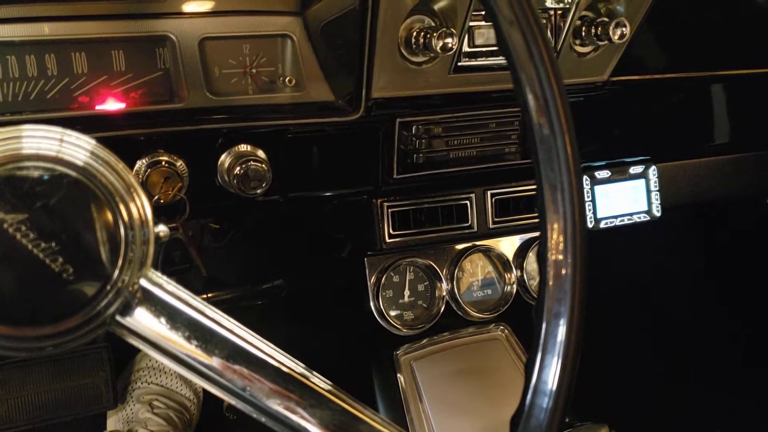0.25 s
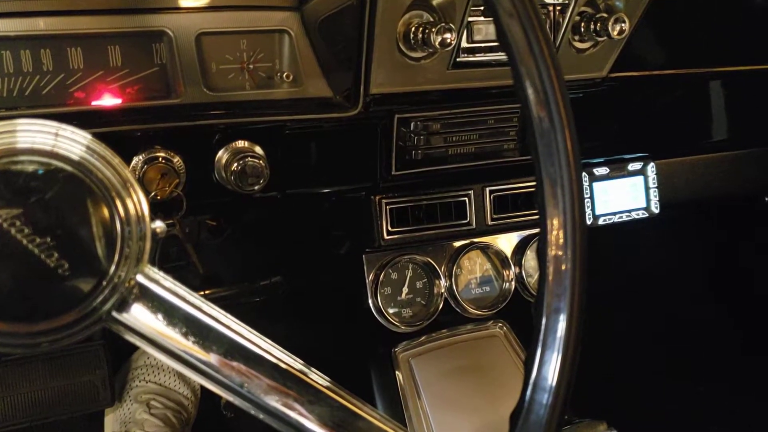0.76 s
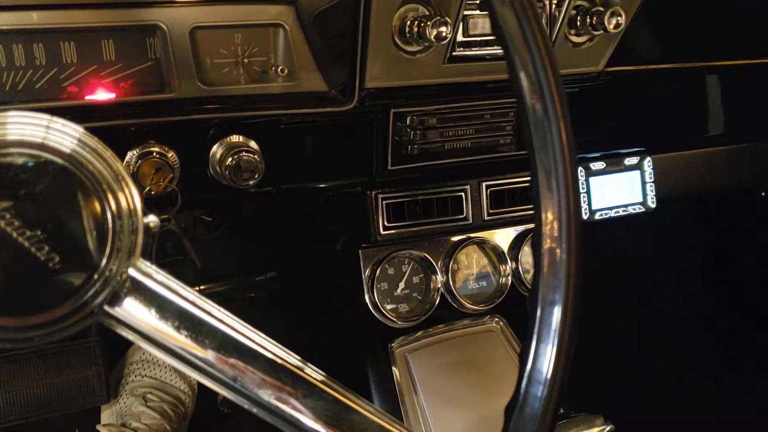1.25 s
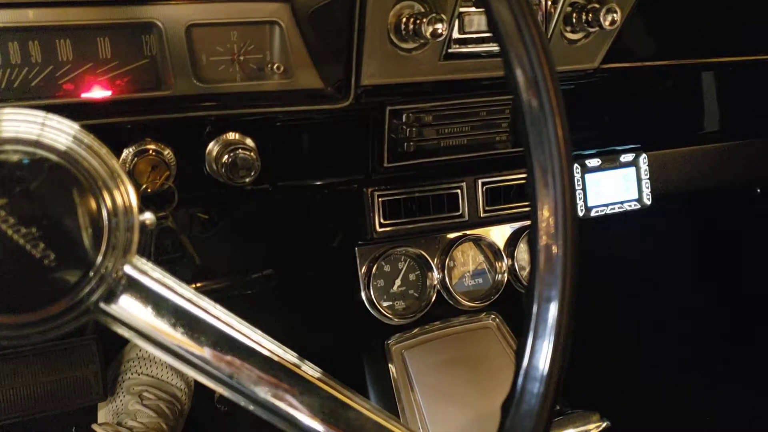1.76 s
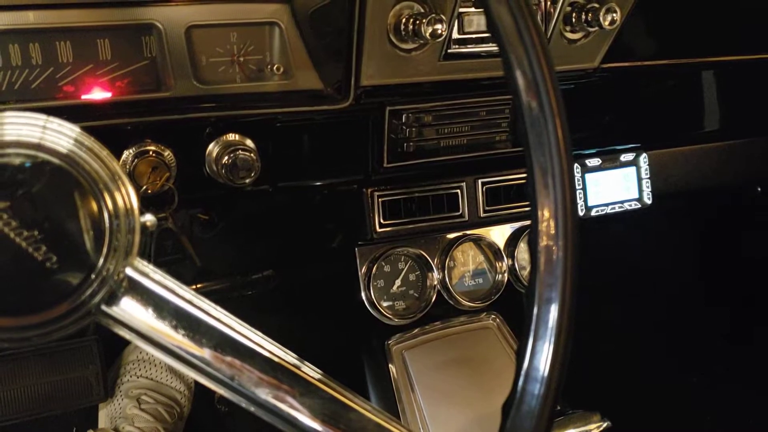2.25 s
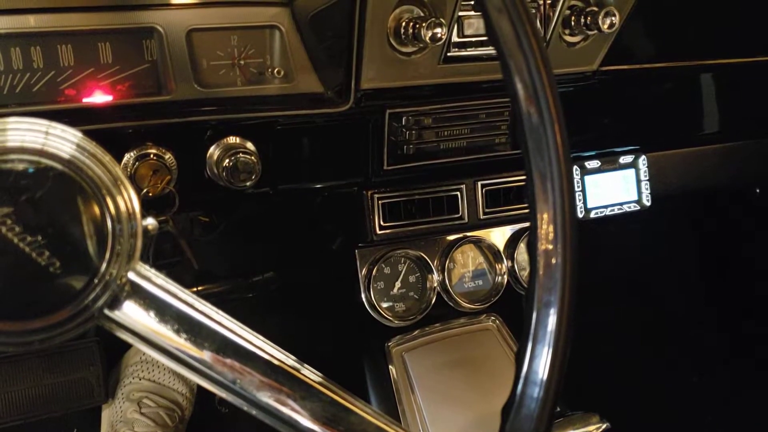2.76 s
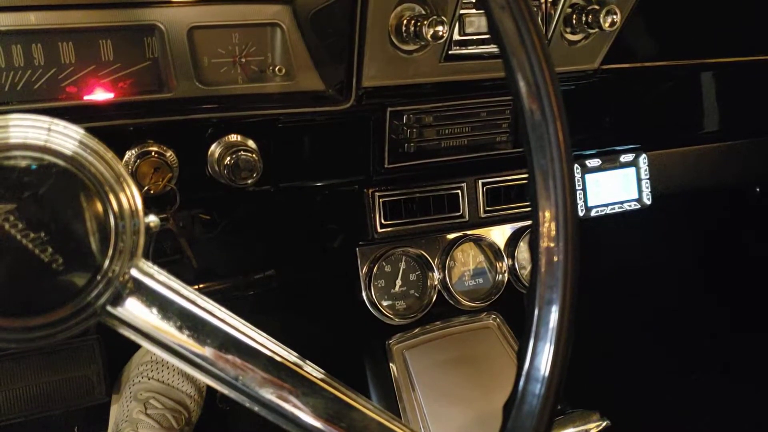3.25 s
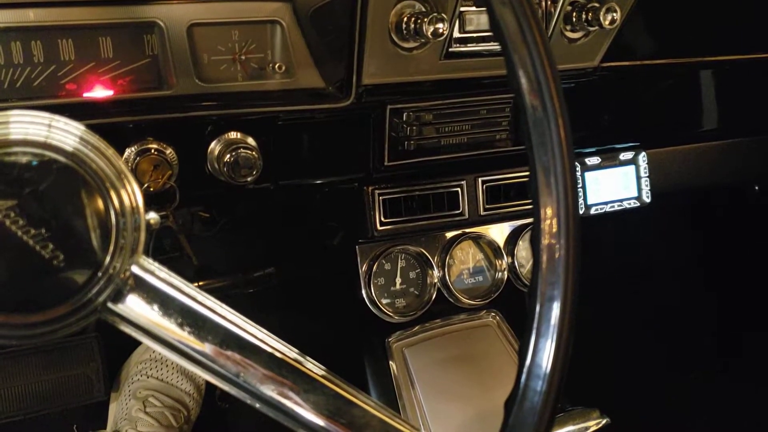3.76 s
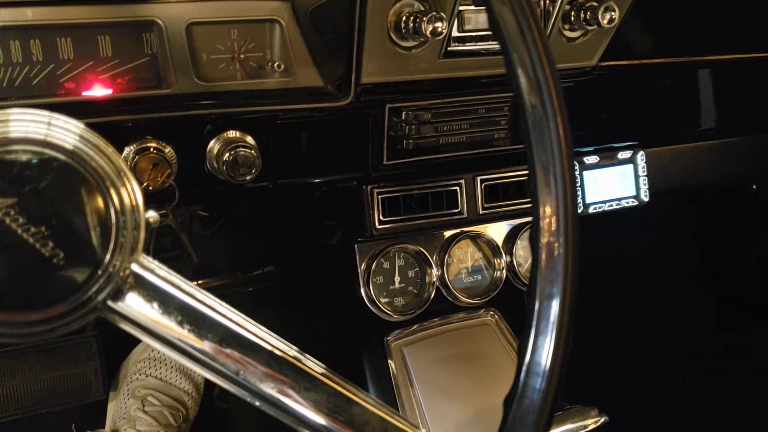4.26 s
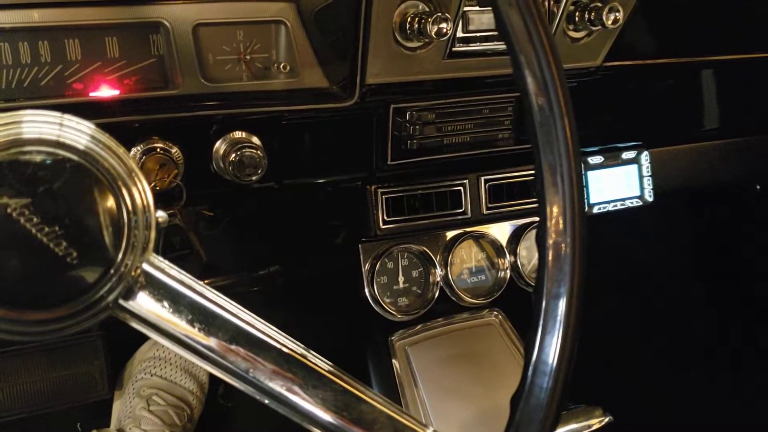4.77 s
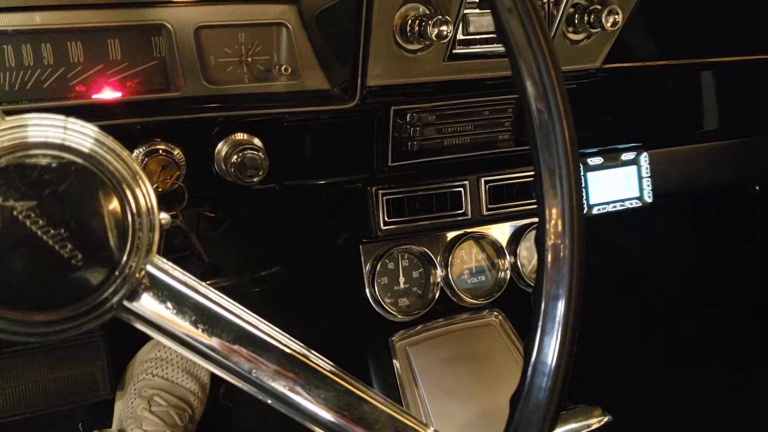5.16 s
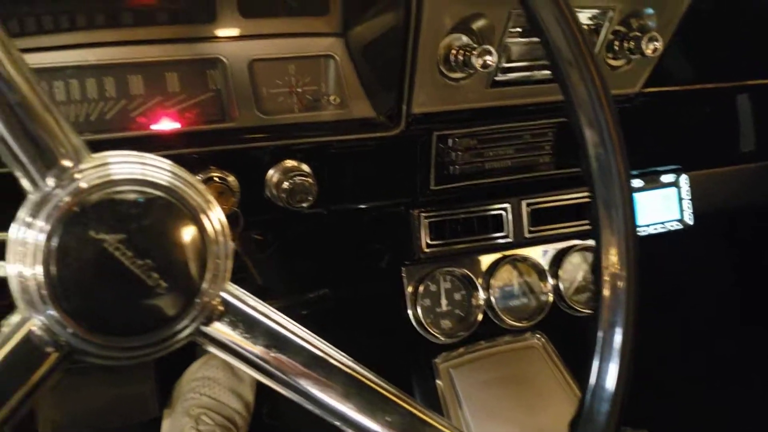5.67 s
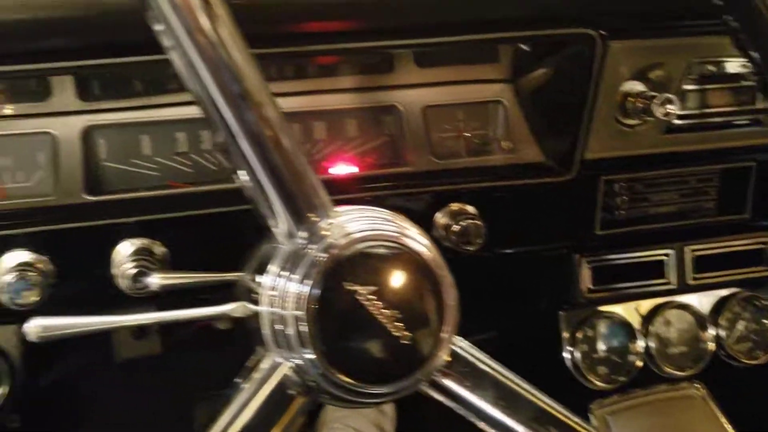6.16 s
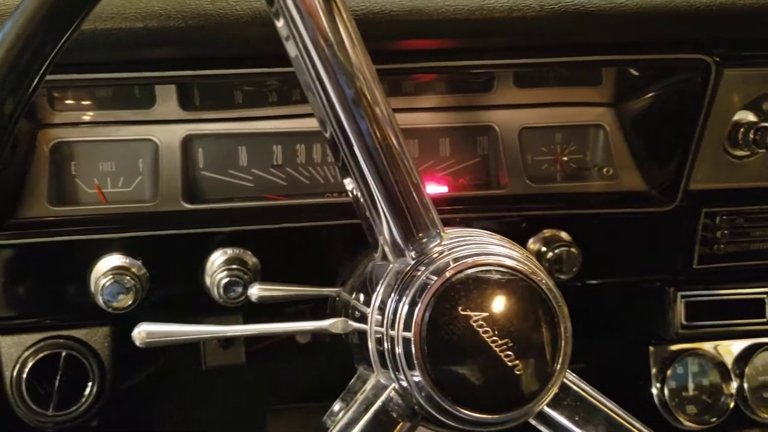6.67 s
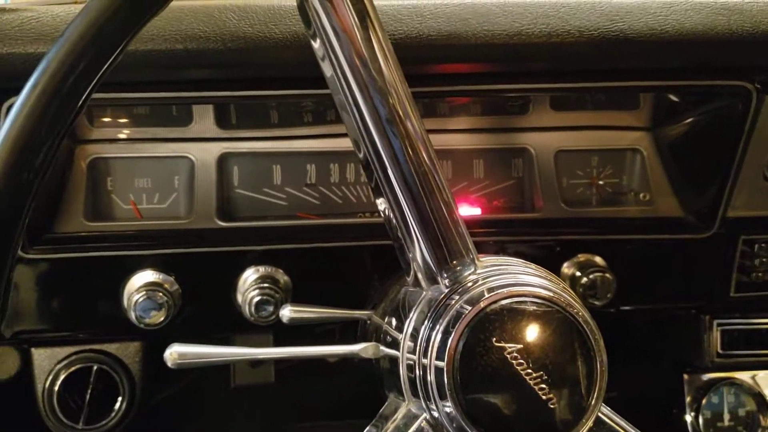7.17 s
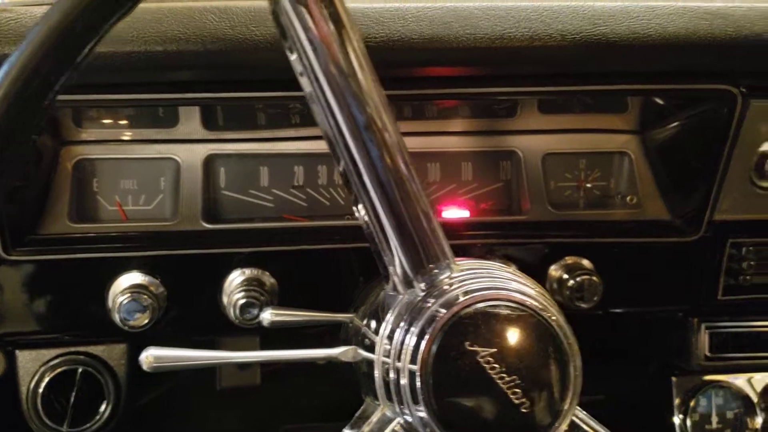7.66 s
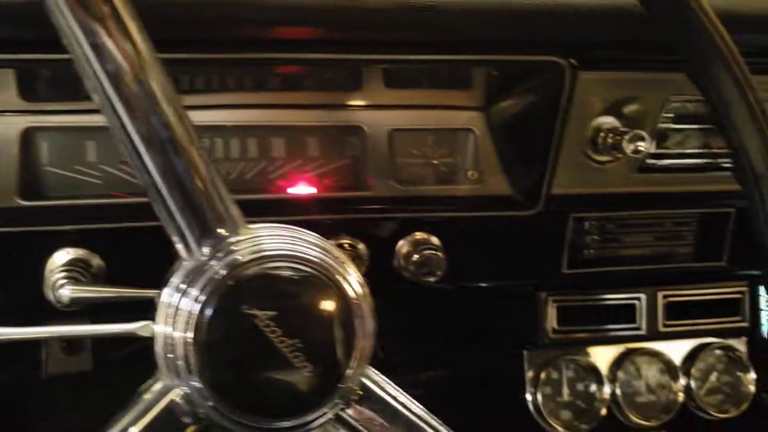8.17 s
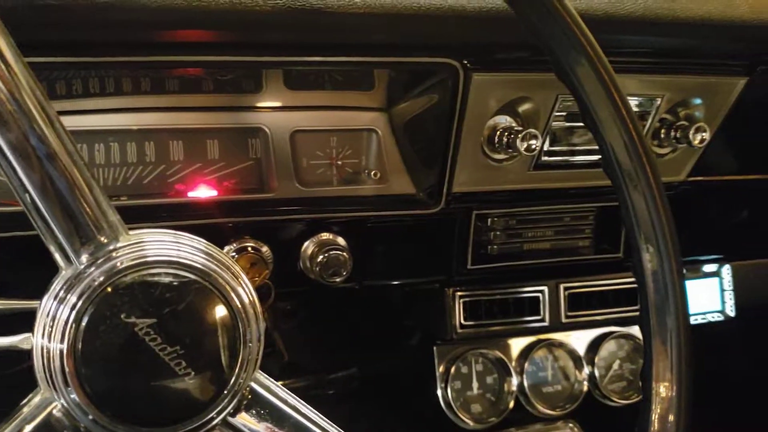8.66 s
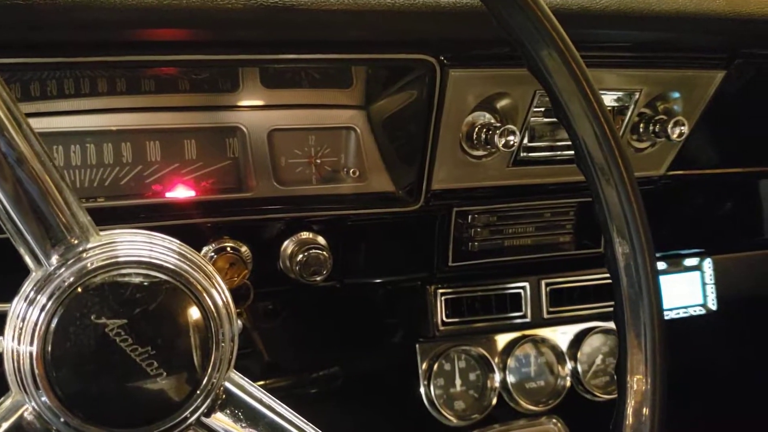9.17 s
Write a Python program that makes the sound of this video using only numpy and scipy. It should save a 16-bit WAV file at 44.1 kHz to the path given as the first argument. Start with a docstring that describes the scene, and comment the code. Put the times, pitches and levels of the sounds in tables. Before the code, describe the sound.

Heard from the driver's seat, a large car engine revs up twice, falls away with uneven thumps, and settles into lumpy idle with valve clatter.

```python
"""A big cross-plane V8 rasps under a light pedal, is blipped twice, runs down and settles to a loping idle.
Heard from the driver's seat, eight unequal exhaust pulses a cycle excite pipes, cabin modes and ringing panels.
Filtered noise bursts at the firings give intake and fan rush at speed; valve seatings give the patter of idle.
A sine whine, brief metallic ticks and ringing lifter clacks are added; left and right differ in colour and delay."""
import sys
import numpy as np
from scipy import signal
from scipy.fft import rfft, irfft
from scipy.io import wavfile
from scipy.ndimage import uniform_filter1d, map_coordinates

SR = 44100
rng = np.random.default_rng(int(sys.argv[2]) if len(sys.argv) > 2 else 0)


def store_pcm(level_fs):
    """Save levels as 16-bit WAV."""
    pcm = np.round(np.clip(level_fs, -1, 1) * 32767).astype(np.int16)
    wavfile.write(sys.argv[1], SR, np.atleast_2d(pcm).T)


N = 415422
TIME = np.arange(N) / SR  # s
FREQ = np.arange(N // 2 + 1) * SR / N  # Hz

# Steady whine: frequency in Hz, level in dB before and after the microphones move
PUMP_HZ, PUMP_DB = 426, (-61.5, -53)
MOVE_S = (5.6, 6.1)  # the microphones move towards the steering column

# Ticks of loose metal as the engine runs down: [t/s, level/dB before a common trim]
BUZZ_TICKS = [(3.454, -75), (3.47, -57), (3.536, -33), (3.566, -57), (3.616, -59)]

# Hardest clacks of a lifter at idle: [t/s, level/dB before a common trim]
LIFTER_CLACKS = [(5.9237, -40.5), (6.0499, -49), (6.114, -44), (6.2111, -37), (6.2749, -44), (6.4191, -38),
                 (6.5348, -38), (6.8262, -39), (6.995, -45), (7.0357, -36.5), (7.1549, -38), (7.1938, -44),
                 (7.2522, -38), (7.2961, -46), (7.354, -44), (7.4453, -40), (7.468, -38), (7.492, -44),
                 (7.6159, -41), (7.7446, -41), (7.9252, -41), (8.0818, -53), (8.3088, -54), (8.7224, -41),
                 (8.873, -51)]
# Ring of those clacks: [f/Hz, relative level/dB]
CLACK_SPECTRUM = [(2800, -26), (3500, -9), (3950, -29), (4230, 9), (4550, -13), (6800, -7), (9000, -45)]
CHIRP_HZ, CHIRP_DB = 4260, -2  # clearest mode of a clack, against the rest of its ring

# Valve patter through the bulkhead: [f/Hz, relative level/dB]
PATTER_SPECTRUM = [(500, -21), (1000, -8), (1250, -13), (1550, -5), (1900, 2), (2350, -7.5), (2900, -12),
                   (3500, -8), (4250, -6.5), (4900, -12.5), (7000, -11), (8300, -20.5), (11500, -20),
                   (15000, -32)]
# Ticks of the loose lifters: [place in the engine cycle (0-1), relative level/dB]
LIFTER_TICKS = [(0.151, 5.5), (0.45, -2), (0.81, -2.5)]
# Ring of the loose lifters: [f/Hz, relative level/dB]
LIFTER_SPECTRUM = [(2500, -58), (3500, 4), (3900, 3), (4230, 4), (4600, -11), (6500, -4.5), (9000, -39.5)]

# Fan and air cleaner through the bulkhead: [f/Hz, relative level/dB]
RUSH_SPECTRUM = [(250, -26.5), (430, 1), (600, -17.5), (850, -1.5), (1200, -13.5), (1400, -19), (1680, -6),
                 (2030, -1), (2450, -12), (3200, -12), (4000, -8.5), (5500, -14.5), (7200, -12),
                 (8300, -24), (11500, -20), (15000, -32.5)]
RUSH_DB = -1.5  # change of the rush at throttle 1; none when shut
# Rasp of the open carburettor, before its pitch moves: [f/Hz, relative level/dB]
RASP_SPECTRUM = [(1750, -35.5), (1950, 12), (2070, 12.5), (2200, 3), (2400, 3.5), (2600, -0.5), (3000, -11),
                 (3500, -16), (4100, 1), (5200, -16.5), (6500, -17), (9000, -46.5)]
# Centre of the rasp: [t/s, f/Hz]
RASP_CENTRE = [(0, 1976), (.4, 2008), (.65, 2090), (.85, 2130), (1.1, 1960), (1.58, 1890), (1.75, 2008),
               (1.95, 2146), (2.2, 1983)]
# Howl of the carburettor's throat, as placed at RASP_RPM: [f/Hz, relative level/dB]
HOWL_SPECTRUM = [(1900, -44.5), (2330, 3), (2520, -8), (2900, -19), (4400, -29), (4950, -5), (5700, -18.5),
                 (8000, -43)]
RASP_HZ, RASP_RPM = 2050, 2500  # centre of the rasp and engine speed at which the spectra are unshifted
HOWL_RISE = 0.23  # howl frequency grows as this power of engine speed
HOWL_DB, HOWL_SPEED_DB = -8.5, 6  # level against the rasp at RASP_RPM; dB per doubling of speed
AIR_LAG_S = 0.024  # the air follows the pedal a little late

# Floor and dash: [f/Hz, relative level/dB]
BODY_SPECTRUM = [(120, -13), (220, 4), (275, -2.5), (320, 1), (370, -5.5), (480, -8.5), (600, -6),
                 (720, -4.5), (850, -10), (1100, -16), (1500, -12.5), (3000, -71.5)]
# Ringing panels:
# [f/Hz, width/Hz, level/dB at speeds far from the panel's own, its own speed/rpm, level change there/dB]
PANEL_MODES = [(308, 19, -2.5, 2040, 12.5), (362.5, 12, -4, 2400, 14.5), (417.2, 44, -1.5, 2700, 6.5),
               (468.4, 58, -10.5, 3000, 17.5), (675, 46, 4, 1430, 6), (843, 33, 1, 4500, 14),
               (961, 24, 6.5, 1540, -27)]
PANEL_OCTAVES = 0.53  # range of speed over which a panel's level changes

# Crankshaft speed: [t/s, speed/rpm]
CRANK_SPEED = [(0.0, 1614), (0.2, 1680), (0.35, 1860), (0.5, 2316), (0.65, 2810), (0.8, 3132), (0.88, 3170),
               (1.1, 2573), (1.36, 1975), (1.48, 1929), (1.62, 2205), (1.78, 2735), (1.94, 3040),
               (2.15, 2510), (2.39, 2017), (2.9, 1292), (3.36, 975), (3.91, 779), (4.6, 798), (5.21, 763),
               (5.5, 789), (6.93, 780), (7.15, 756), (8.51, 769), (8.88, 792), (9.42, 762)]
# Pedal presses: [down t/s, up t/s, throttle (0-1), carburettor level/dB]
PEDAL_PRESSES = [(-0.4, 0.104, 0.36, 8.5), (0.217, 0.805, 0.71, 1), (1.379, 1.866, 0.73, 1)]
OPEN_S, CLOSE_S = 0.25, 0.23  # full-scale ramp time on opening; decay constant on release
IDLE_RPM = 780  # reference speed of the loudness laws
# Cylinders in firing order, as their pulses leave the pipes:
# [strength/dB and lateness/crank degrees at lope 1, pipe delay/ms at speed, change/dB under throttle]
CYLINDER_PULSES = [(2.5, 24, 0.41, 3), (4.1, -13.5, 1.85, -0.3), (-4, -6, 1.1, 3.5), (1, -5.8, .3, 2),
                   (2.3, 22, 1.65, 0.4), (-.4, 4.5, 0.08, -5), (0.5, -9.5, 0.69, 2.5), (1.2, 14.5, 1.4, 0)]
FIRST_FIRING = 0.81  # place of the first firing, in firing intervals
# Burn with the throttle shut: [speed/rpm, lope (0 = cylinders alike, 1 = full inequality), scatter/dB]
BURN_ROUGHNESS = [(769, 0.933, 2), (957, 0.55, 3), (1230, 0.23, 3), (1500, 0.41, 4.5), (2630, .6, 4.5)]
THROTTLE_EVENS, THROTTLE_CLEANS = 0.8, 0.93  # shares of lope and of scatter that pulling removes
CLEAN_THROTTLE = 0.25  # throttle scale over which the burn steadies
STUMBLE_S = 0.046  # decay constant of the pedal's steadying effect on the burn after release
# Unburnt fuel thumps in the pipes: [t/s, level of the nearest firing/dB]
PIPE_THUMPS = [(.855, 7), (1.975, 4.5), (2.075, 6), (2.215, 6.5), (2.375, 12), (2.45, 10), (2.685, 10.5)]

# Silencers and cabin air: [f/Hz, relative level/dB]
PIPE_SPECTRUM = [(20, -51.5), (32, -4), (42, -5), (52, 3), (65, 12), (80, 5), (98, -10.5), (125, -4.5),
                 (150, -13.5), (178, -21.5), (194, -25), (209, -16.5), (228, -28), (265, -35), (350, -47),
                 (900, -69.5)]
# Hardening of the pulses by an open throttle: [f/Hz, level change/dB]
BARK_SPECTRUM = [(30, -7.5), (55, -18), (70, -5), (85, 6), (100, 4.5), (120, -0.5), (140, 1), (165, 4),
                 (190, 9), (215, 9), (260, 12.5), (320, 15), (430, 22), (600, 16.5), (900, -6)]
# Cabin modes and nulls crossed by the firing note: [f/Hz, width/Hz, level change/dB with throttle shut]
CABIN_BOOMS = [(61.3, 2.7, 6.5), (77.3, 15.7, 8), (102, 6, -5.1), (147.4, 23, 2.5), (199.3, 19, -5)]
THROTTLE_BOOM = 2.6  # throttle 1 deepens the booms by this share
STARVE_RPM, STARVE_DB = (1370, 1460), -4  # coasting above this range weakens the firing note

# Loudness laws: (level/dB at IDLE_RPM, dB per doubling of speed, dB for throttle 1, dB once microphones are nearer)
EXHAUST_LOUDNESS = (-19.5, 3, -8, 3.5)
BODY_LOUDNESS = (-49, 5, 3.5, 5)
INTAKE_LOUDNESS = (-54, 5.5, 9, 6.5)
VALVE_LOUDNESS = (-50.5, -4.5, 31, 6.5)
# Overall level of the engine layers over time: [t/s, level/dB]
OVERALL_LEVEL = [(0, -5.5), (0.15, -5.5), (0.45, 0.5), (1.35, -3), (1.6, 5), (2.3, 2), (3.4, -2), (3.9, -2),
                 (5.5, 0.6), (7.7, 1.7), (9.42, 0)]

# Microphone pair: [f/Hz, left minus right level/dB]
SIDE_LEVELS = [(30, 1.84), (65, 2.7), (125, 4.6), (300, 6.05), (700, 5.06), (1200, 7), (2000, 9.1),
               (3000, 10.44), (4500, 15.1), (7000, 16.86), (8300, 17.9), (10000, 0.2), (11500, -9),
               (15000, -1)]
# Likeness of the reflections on the two sides: [f/Hz, likeness (0-1)]
SIDE_LIKENESS = [(150, 0.91), (300, 1), (600, 0.32), (2000, 0.35), (4000, 0.061), (15000, 0.05)]
RIGHT_LAG_S = 0.00038  # sound reaches the left microphone first
TOP_HZ = 15500  # upper band edge


def undb(db):
    """Amplitude ratio from decibels."""
    return 10 ** (np.asarray(db) / 20)


def curve(table, at=TIME):
    """Linear interpolation of a table's columns over its first column."""
    place, *columns = np.transpose(table)
    return [np.interp(at, place, column) for column in columns]


def spectrum(points):
    """Linear interpolation over log frequency."""
    hz, value = np.transpose(points)
    return np.interp(np.log(FREQ + 1), np.log(hz), value)


def colour(x, db):
    """Minimum-phase filtering: folding the cepstrum makes a given gain curve causal."""
    cepstrum = irfft(db * np.log(10) / 20, N)
    cepstrum[1:N // 2] *= 2
    cepstrum[N // 2 + 1:] = 0
    response = irfft(np.exp(rfft(cepstrum)), N)[:SR // 4]
    return signal.fftconvolve(np.atleast_2d(x), response[None], axes=1)[:, :N]


def steady(x, size=9000):
    """Power normalisation: the running RMS of the mid signal is held near 1."""
    power = uniform_filter1d(uniform_filter1d(x.mean(0) ** 2, size), size)
    return x / np.sqrt(power + 1e-18)


def walk(rate):
    """Slow random modulation: levels held for 1 / rate seconds, then smoothed twice."""
    k = int(SR / rate)
    held = np.repeat(rng.standard_normal(N // k + 1), k)
    return uniform_filter1d(uniform_filter1d(held, k), k)[:N]


def pulses(times, sizes):
    """Impulse train with fractional timing: each click is shared between two samples."""
    at = np.clip(times * SR, 0, N)
    i = at.astype(int)
    late_share = at - i
    early = np.bincount(i, sizes * (1 - late_share), N + 2)
    late = np.bincount(i + 1, sizes * late_share, N + 2)
    return (early + late)[:N]


def decaying(clicks, decay_s):
    """Exponential relaxation after each click, with time constant decay_s."""
    return signal.lfilter([1], [1, -np.exp(-1 / (decay_s * SR))], clicks)


def bursts(clicks, decay_s, bed):
    """Amplitude-modulated noise: dying bursts over an even bed, independent on two paths."""
    gate = decaying(clicks, decay_s)
    gate = gate / (uniform_filter1d(gate, size=12000) + 1e-9)
    return (gate + bed) * rng.standard_normal((2, N))


def cabin(x, t60):
    """Diffuse reverberation off glass and trim, with frequency-dependent likeness between sides."""
    t = TIME[:SR // 4]
    tails = rng.standard_normal((2, len(t))) * undb(-60 * t / t60)
    paths = rfft(tails, N)
    # reflections ripple the spectrum finely but leave its broad shape alone
    paths /= np.sqrt(uniform_filter1d(abs(paths) ** 2, size=1100, axis=1))
    mid, side = paths * rfft(x)
    alike = np.clip(spectrum(SIDE_LIKENESS), -1, 1)
    return irfft(mid * np.sqrt(1 + alike) + side * np.sqrt(1 - alike) * np.array([[1], [-1]]), N)


def microphones(x):
    """Level and time differences of a spaced pair: power is shared per frequency and the right lags."""
    gains = undb(spectrum(SIDE_LEVELS) * np.array([[.5], [-.5]]))
    lag = np.exp(-2j * np.pi * FREQ * RIGHT_LAG_S * np.array([[0], [1]]))
    return irfft(rfft(x) * lag * gains / np.sqrt(np.mean(gains ** 2, 0)), N)


def pedal(close_s):
    """Throttle envelope 0-1: linear opening, a hold and exponential relaxation on release."""
    presses = []
    for down, up, depth, _ in PEDAL_PRESSES:
        opening = np.clip((TIME - down) / OPEN_S, 0, 1)
        release = np.exp(-np.maximum(TIME - up, 0) / close_s)
        presses.append(depth * opening * release)
    return np.clip(np.max(presses, 0), 0, 1)


def loudness(law, rpm, throttle):
    """Power law of level against speed, with throttle and microphone distance added in decibels."""
    idle_db, speed_db, throttle_db, nearer_db = law
    nearer = np.interp(TIME, MOVE_S, [0, 1])
    return undb(idle_db + speed_db * np.log2(rpm / IDLE_RPM) + throttle_db * throttle + nearer_db * nearer)


def pump(waver=0.00212, flicker_db=2):
    """Frequency-modulated sine: a thin whine, likely the electric fuel pump, clearer late in the idle."""
    phase = 2 * np.pi * np.cumsum(PUMP_HZ * (1 + waver * walk(8.5))) / SR
    db = np.interp(TIME, MOVE_S, PUMP_DB) + flicker_db * walk(6.6)
    return microphones(np.sqrt(2) * np.sin(phase) * undb(db))


def buzz(ring_s=0.0023, trim_db=-6):
    """Impact excitation: loose metal gives brief bright noise bursts."""
    s, db = np.transpose(BUZZ_TICKS)
    gate = decaying(pulses(s, undb(db + trim_db)), ring_s)
    bright = spectrum([(7000, -26), (12000, 4), (15000, -9)])
    return microphones(colour(gate * rng.standard_normal((2, N)), bright))


def clacks(ring_s=0.03, trim_db=-6.5, waver=0.0048):
    """Damped modal ringing: a hard lifter strike sounds as coloured noise with a short wavering chirp."""
    s, db = np.transpose(LIFTER_CLACKS)
    gate = decaying(pulses(s, undb(db + trim_db)), ring_s)
    mode = np.sin(2 * np.pi * np.cumsum(CHIRP_HZ * (1 + waver * walk(120))) / SR)
    ring = steady(microphones(colour(rng.standard_normal((2, N)), spectrum(CLACK_SPECTRUM))))
    return gate * (ring + undb(CHIRP_DB) * microphones(mode))


def tappets(cycle, unequal_db=3, scatter_db=2.0, count=16):
    """Cyclic impacts: each valve seats once a cycle, with a strength and lag of its own clearance."""
    k = np.arange(int(cycle[-1] * count))
    own_db, own_lag = rng.standard_normal((2, count))[:, k % count]
    times = np.interp((k + .25 * own_lag) / count, cycle, TIME)
    return pulses(times, undb(unequal_db * own_db + scatter_db * rng.standard_normal(len(k))))


def valve_gear(cycle, lifter_db=-9, tick_scatter_db=4, wander_db=1.3):
    """Superposed impact noise: a dense valve patter under uneven ticks of the loose lifters."""
    seats = tappets(cycle, unequal_db=1, scatter_db=2.2)
    patter = cabin(bursts(seats, 0.0043, 1.0), 0.089)
    patter = steady(microphones(colour(patter, spectrum(PATTER_SPECTRUM))))
    place, db = np.transpose(LIFTER_TICKS)
    due = np.arange(int(cycle[-1]))[:, None] + place
    sizes = undb(db + tick_scatter_db * rng.standard_normal(due.shape))
    ticks = pulses(np.interp(due.ravel(), cycle, TIME), sizes.ravel())
    lifter = cabin(bursts(ticks, 0.026, 0.22), 0.13)
    lifter = steady(microphones(colour(lifter, spectrum(LIFTER_SPECTRUM))))
    return undb(wander_db * walk(21)) * patter + undb(lifter_db) * lifter


def climbing(points, fired, ratio, decay_s, bed):
    """Moving resonances by time warping: filtered gulps of air are read at the given speed ratio."""
    at = np.cumsum(ratio)
    # the inverse warp beforehand keeps the gulps in step with the firings
    gulps = bursts(fired, decay_s, bed)[:, np.searchsorted(at, np.arange(N)) % N]
    gulps[:, int(at[-1]):] = 0
    sound = microphones(colour(cabin(gulps, 0.088), spectrum(points)))
    return steady(np.array([map_coordinates(side, [at], order=3, mode="mirror") for side in sound]))


def intake(fired, rpm, throttle):
    """Flow noise: fan and air cleaner rush, while throttle brings in the carburettor's moving rasp and howl."""
    rush = cabin(bursts(fired, 0.00079, 6.4), 0.075)
    rush = steady(microphones(colour(rush, spectrum(RUSH_SPECTRUM))))
    rasp = climbing(RASP_SPECTRUM, fired, curve(RASP_CENTRE)[0] / RASP_HZ, decay_s=.0028, bed=0.33)
    howl = climbing(HOWL_SPECTRUM, fired, (rpm / RASP_RPM) ** HOWL_RISE, decay_s=0.0013, bed=0.3)
    carburettor = rasp + howl * undb(HOWL_DB + HOWL_SPEED_DB * np.log2(rpm / RASP_RPM))
    _, up, _, press_db = np.transpose(PEDAL_PRESSES)
    carburettor_gain = np.sqrt(throttle) * undb(np.interp(TIME, up, press_db))
    return undb(RUSH_DB * np.sqrt(throttle)) * rush + carburettor_gain * carburettor


def engine_bay(fired, cycle, rpm, fast, throttle):
    """Equal-power crossfade: air leads at speed and valve gear takes over as the revs fall."""
    flow = np.interp(TIME - AIR_LAG_S, TIME, throttle)
    air = intake(fired, rpm, flow) * loudness(INTAKE_LOUDNESS, rpm, flow)
    valves = valve_gear(cycle) * loudness(VALVE_LOUDNESS, rpm, throttle)
    return np.sqrt(fast) * air + np.sqrt(1 - fast) * valves


def body(fired, rpm, throttle, knock_db=-2, pulling_db=9):
    """Forced vibration of floor and panels, each panel made louder or softer around one engine speed."""
    knocks = undb(knock_db + pulling_db * throttle) * steady(fired[None])
    drive = steady(bursts(fired, 0.0044, 5.5)) + knocks
    sound = colour(cabin(drive, 0.21), spectrum(BODY_SPECTRUM))
    shake = rfft(drive[0])
    for hz, width, db, panel_rpm, change_db in PANEL_MODES:
        ring = irfft(shake / (1 + 2j * (FREQ - hz) / width) ** 2, N)
        nearness = np.exp(-(np.log2(rpm / panel_rpm) / PANEL_OCTAVES) ** 2)
        sound = sound + ring * undb(db + change_db * nearness)
    return steady(microphones(sound))


def firings(cycle, rpm, fast, stray_degrees=2.05):
    """Periodic excitation, eight pulses in two turns: inequality makes lope, poor burning makes scatter."""
    k = np.arange(int(cycle[-1] * 8))
    due = (k + FIRST_FIRING) / 8
    pulling = np.tanh(pedal(STUMBLE_S) / CLEAN_THROTTLE)
    rpm, fast, pulling = (np.interp(due, cycle, control) for control in (rpm, fast, pulling))
    lope, scatter_db = curve(BURN_ROUGHNESS, rpm)
    lope = lope * (1 - THROTTLE_EVENS * pulling)
    scatter_db = scatter_db * (1 - THROTTLE_CLEANS * pulling)  # a light pedal already steadies the burn
    db, late, pipe_ms, pulling_db = np.array(CYLINDER_PULSES)[k % len(CYLINDER_PULSES)].T
    timing_chance, size_chance = rng.standard_normal((len(k), 2)).T
    # stray_degrees: crank degrees of timing scatter for each dB of size scatter
    degrees = lope * late + stray_degrees * scatter_db * timing_chance
    times = np.interp(due + degrees / 720, cycle, TIME)
    # unequal lengths of pipe bring out the growl of the odd orders
    times = times + fast * pipe_ms / 1000
    size_db = lope * db + pulling * pulling_db + scatter_db * np.minimum(size_chance, 1)
    for s, thump_db in PIPE_THUMPS:
        size_db[np.argmin(abs(times - s))] = thump_db
    return pulses(times, undb(size_db))


def exhaust(fired, cycle, rpm, throttle):
    """Resonance: pulses ring the pipes, and cabin modes and nulls reshape the firing note."""
    soft = colour(fired, spectrum(PIPE_SPECTRUM))
    hard = colour(soft, spectrum(BARK_SPECTRUM))
    tone = steady(microphones((1 - throttle) * soft + throttle * hard))
    firing_hz = 4 * rpm / 60
    # shift the firing note to 0 Hz, smooth it, and shift it back
    turn = np.exp(2j * np.pi * 8 * cycle)
    window = np.hanning(SR // 10)
    slow = signal.fftconvolve(tone / turn, window[None] / window.sum(), "same", axes=1)
    note = 2 * (turn * slow).real
    boom_db = sum(db * np.exp(-((firing_hz - hz) / width) ** 2) for hz, width, db in CABIN_BOOMS)
    starved = np.interp(rpm, STARVE_RPM, [0, 1]) * np.clip(1 - 3 * throttle, 0, 1)
    note_gain = undb(boom_db * (1 + THROTTLE_BOOM * throttle) + STARVE_DB * starved)
    return tone + (note_gain - 1) * note


def scene():
    """Superposition: one crankshaft and one pedal drive exhaust, body and engine bay."""
    rpm, = curve(CRANK_SPEED)
    fast = np.clip((rpm - 950) / 800, 0, 1)
    throttle = pedal(CLOSE_S)
    cycle = np.cumsum(rpm / 120) / SR  # engine cycles of two turns
    fired = firings(cycle, rpm, fast)
    engine = engine_bay(fired, cycle, rpm, fast, throttle)
    engine = engine + body(fired, rpm, throttle) * loudness(BODY_LOUDNESS, rpm, throttle)
    engine = engine + exhaust(fired, cycle, rpm, throttle) * loudness(EXHAUST_LOUDNESS, rpm, throttle)
    return pump() + buzz() + clacks() + engine * undb(curve(OVERALL_LEVEL)[0])


def record(dry):
    """Band limiting: a gentle high-pass blocks the deepest rumble and a steep low-pass cuts the top."""
    dry = signal.sosfilt(signal.butter(1, 5, "high", fs=SR, output="sos"), dry)
    return signal.sosfilt(signal.ellip(8, .2, 70, TOP_HZ, fs=SR, output="sos"), dry)


dry = scene()
out = record(dry)
store_pcm(out)
```